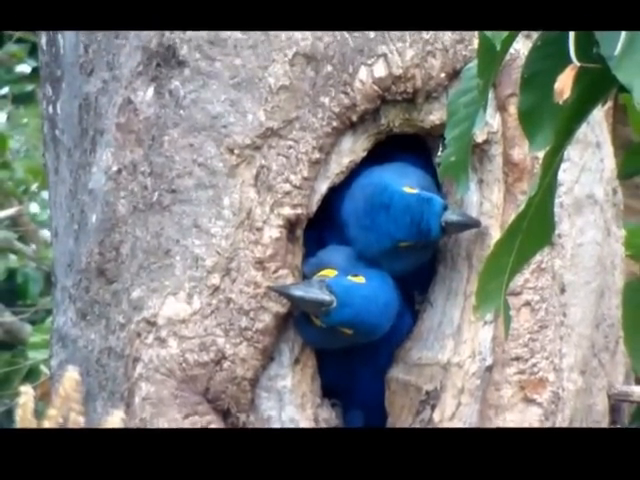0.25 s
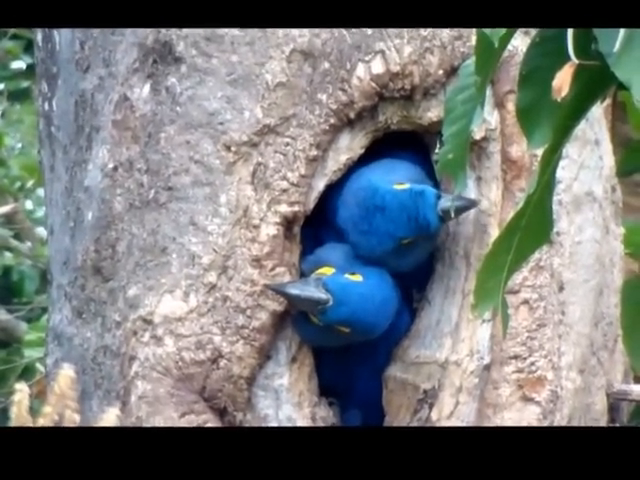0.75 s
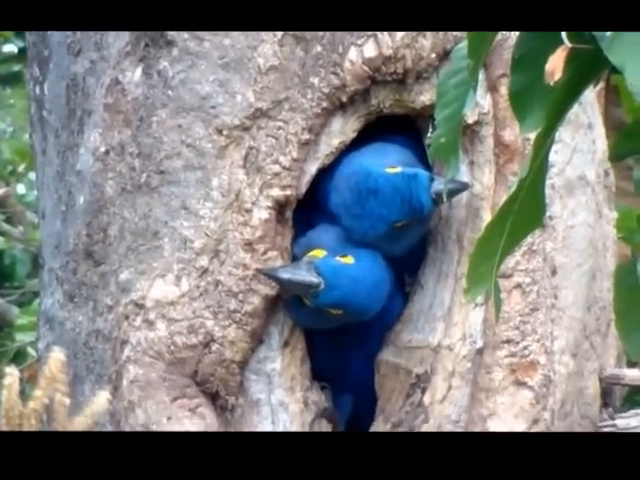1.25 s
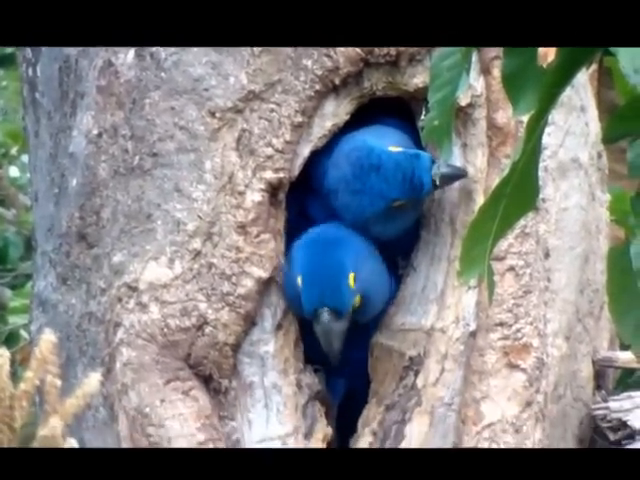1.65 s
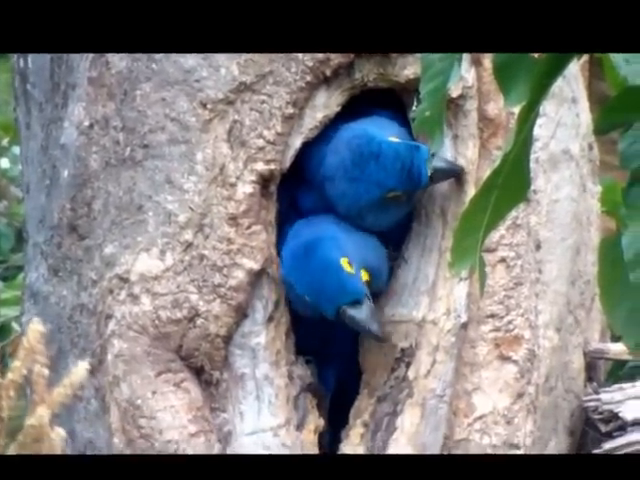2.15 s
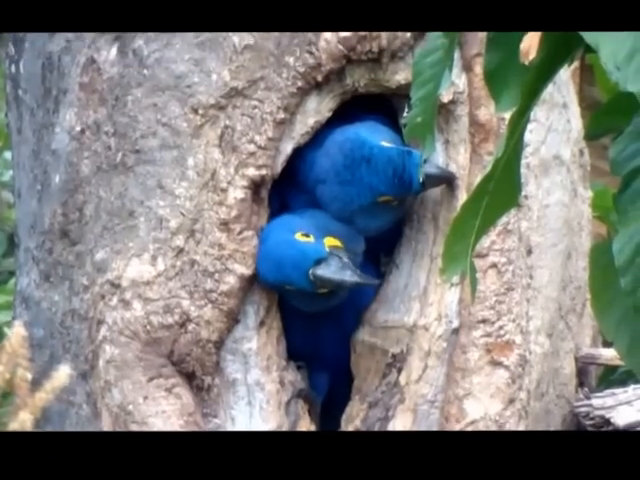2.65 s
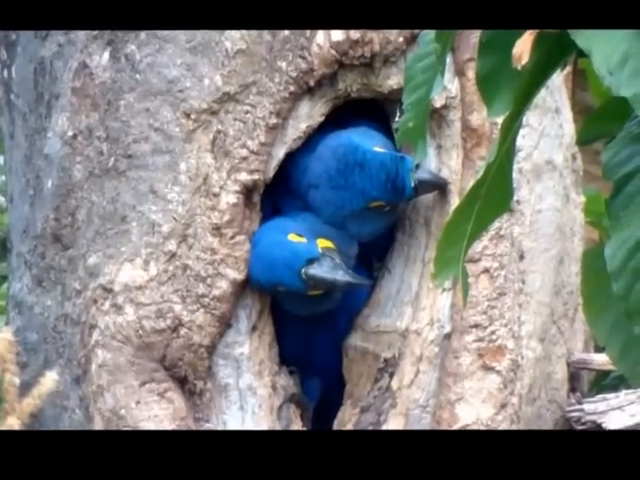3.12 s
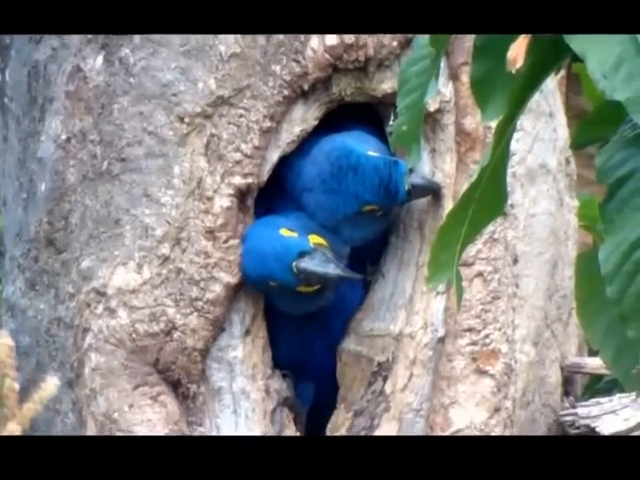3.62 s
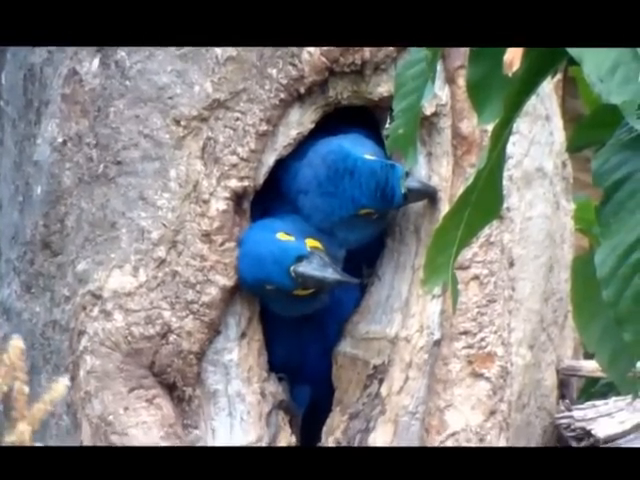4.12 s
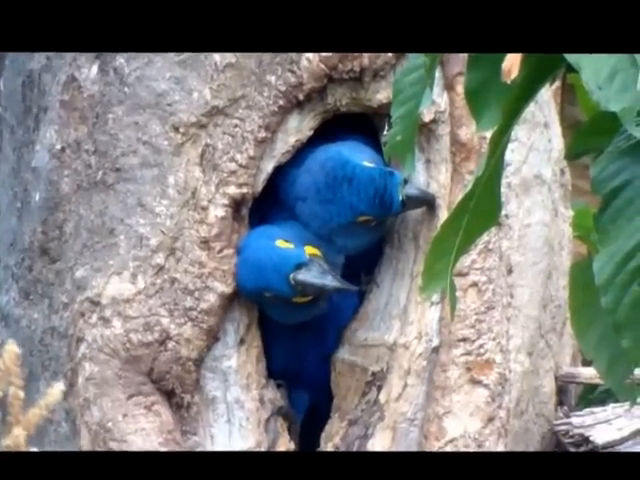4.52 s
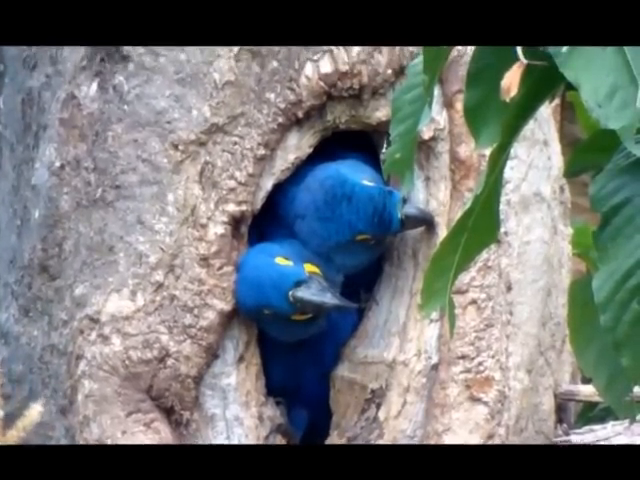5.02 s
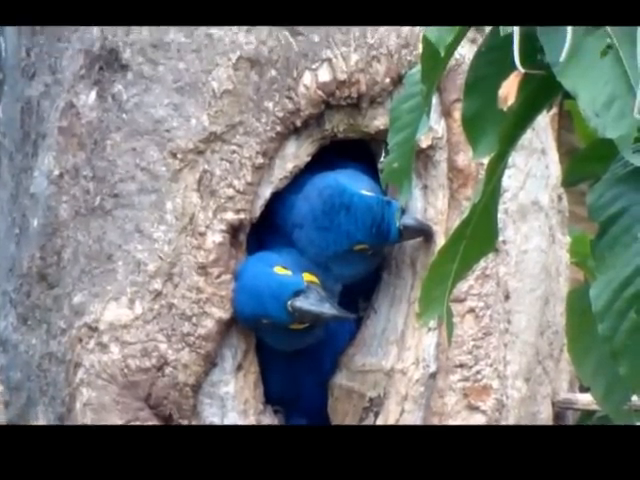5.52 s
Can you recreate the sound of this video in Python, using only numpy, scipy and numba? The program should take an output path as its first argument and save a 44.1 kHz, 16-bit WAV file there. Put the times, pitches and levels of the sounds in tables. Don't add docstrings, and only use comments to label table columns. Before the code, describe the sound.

Large parrots at a tree hole: one harsh loud squawk, a weaker reply, later faint calls, with insects, small birds and wind puffs.

```python
import sys
import numpy as np
from scipy import signal
from scipy.fft import rfft, irfft
from scipy.io import wavfile
from scipy.ndimage import uniform_filter1d
from numba import njit

SR = 44100
rng = np.random.default_rng(int(sys.argv[2]) if len(sys.argv) > 2 else 0)


def transcribe(signal):
    frames = np.atleast_2d(signal).T
    limited = np.clip(frames, -1, 1)
    pcm = np.round(limited * 32767).astype(np.int16)
    wavfile.write(sys.argv[1], SR, pcm)


def gain_from_db(level_db):
    decades = np.asarray(level_db, float) / 20
    return 10 ** decades


N = 254010
TIME = np.arange(N) / SR


def unit(x):
    return x / np.sqrt(np.mean(x ** 2))


def evenly(values, at):
    return np.interp(at, np.linspace(at[0], at[-1], len(values)), values)


@njit
def flaps(hz, rough, chance, jitter, shimmer):
    pulses, phase = np.zeros(len(hz) + 1), np.empty(len(hz))
    p, k = 0., 0
    for i in range(len(hz)):
        step = hz[i] * np.exp(jitter * rough[i] * chance[k, 0]) / SR
        p += step
        if p >= 1:
            p, k = p - 1, k + 1
            size = np.exp(shimmer * rough[i] * chance[k, 1])
            pulses[i] += size * p / step
            pulses[i + 1] += size * (1 - p / step)
        phase[i] = p
    return pulses[:-1], phase


@njit
def resonance(x, hz, width):
    y, band, low = np.empty(len(x)), 0., 0.
    for i in range(len(x)):
        g, k = np.tan(np.pi * hz[i] / SR), width / hz[i]
        v = (band + g * (x[i] - low)) / (1 + g * (g + k))
        band, low, y[i] = 2 * v - band, low + 2 * g * v, k * v
    return y


def macaw(throbs, throat, rough, dip_s, breath_db, hum_db, sag=None):
    s, start_hz, db, dip_db = np.transpose(throbs)
    rough = evenly(rough, s)
    end_hz = np.append(start_hz[1:], start_hz[-1])
    if sag:
        end_hz = start_hz * (1 - evenly(sag, s))
    first, last = int(s[0] * SR), int(s[-1] * SR) + SR // 50
    t = TIME[first:last]
    k = np.clip(np.searchsorted(s, t, side="right") - 1, 0, len(s) - 1)
    along = np.clip((t - s[k]) / np.append(np.diff(s), 1)[k], 0, 1)
    hz = uniform_filter1d(start_hz[k] + (end_hz - start_hz)[k] * along, size=150)

    chance = np.clip(rng.standard_normal((1000, 2)), -2, 1.5)
    pulses, phase = flaps(hz, rough[k], chance, .22, .8)
    air = unit(rng.standard_normal(len(t)) * np.exp(-phase / .5))
    source = unit(pulses - pulses.mean()) + gain_from_db(breath_db) * rough[k] * air
    raspy = source + gain_from_db(5) * air

    u, voice = np.linspace(0, 1, len(t)), 0
    for j, (a_hz, mid_hz, b_hz, width, *moving_db) in enumerate(throat):
        upper = j > 5
        shift = uniform_filter1d(rng.standard_normal((len(s), 2))[k], size=300, axis=0)
        drift = .05 * (along - .5) / (1 + (j > 4))
        centre = evenly([a_hz, mid_hz, b_hz], u) * (1 + .013 * shift[:, 0] - drift)
        gain = gain_from_db(evenly(moving_db, u) + shift[:, 1] * (j > 3)) / np.sqrt(width)
        if sag and j == 3:
            gain *= gain_from_db(6 * uniform_filter1d(.5 - along, size=150))
        if upper:
            gain *= np.clip(.1 + (t - s[0]) / .05, 0, 1)
        once = resonance(raspy if upper else source, centre, float(width))
        voice = voice + (-1) ** j * gain * resonance(once, centre, float(width))
    voice /= np.sqrt(uniform_filter1d(voice ** 2, size=SR // 60))
    voice += gain_from_db(hum_db) * np.sqrt(2) * np.sin(2 * np.pi * np.cumsum(hz) / SR)

    lag = t - s[:, None]
    dip_width = np.where(lag < 0, 1.4 * dip_s, .7 * dip_s)
    dips = np.sum(dip_db[:, None] * np.exp(-(lag / dip_width) ** 2), axis=0)
    level_db = db[k]
    if sag:
        level_db = level_db - 18 * (1 - end_hz / start_hz)[k] * along
    ending = np.clip((s[-1] - t) / 0.008 + 1, 0, 1)
    out = np.zeros(N)
    out[first:last] = voice * gain_from_db(uniform_filter1d(level_db, size=200) + dips) * ending
    return out


def squawk():
    # (time [s], pitch [Hz], level [dB], dip at start [dB])
    throbs = [(.318, 265, -36, -14), (.33, 265, -29, -1), (.347, 270.5, -43, -4), (.361, 264.5, -20, -3),
              (.378, 265.2, -13, -1), (.405, 314.2, -11, -5), (.443, 322.2, -10.5, -5),
              (.476, 317, -10.5, -4), (.511, 304, -11.5, -4), (.547, 304.2, -11.5, -2),
              (.585, 307.1, -12.5, -10), (.62, 297.2, -12, -4), (.655, 284.4, -12.5, -5),
              (.689, 276.8, -13.5, -6), (.728, 305, -11.5, -11), (.766, 298.6, -9, -11),
              (.781, 269.6, -19, -3)]
    # (start [Hz], midway [Hz], end [Hz], width [Hz], levels from start to end [dB])
    throat = [(274, 322, 317, 200, -28, -23, -20), (492, 511, 669, 340, -17, -23.5, -14),
              (1244, 1240, 1180, 300, 4.3, 0.86, 2), (1460, 1456, 1417, 240, 8.6, 4.3, 2.4),
              (1993, 1849, 1747, 392, -14, 2, -6, -2, -1),
              (2100, 2388, 2698, 386, -11, -18, -13, -5.5, -5.5, -5, -1),
              (3897, 3587, 3839, 894, -58, -8.5, -16, -9.5, -9.5),
              (5104, 5245, 5402, 508, -37, -26, -27, -25, -18),
              (6393, 6437, 6296, 602, -10, -23.5, -17.5, -25, -22), (7436, 8998, 9800, 12000, -36, -31),
              (4400, 4350, 4450, 398, -42, -28, -24, -37, -22),
              (7500, 7596, 7397, 697, -64, -35, -47, -57, -40),
              (2800, 2600, 2600, 1300, -4, -9.5, -13.5, -36, -37, -40, -38)]
    return macaw(throbs, throat, (.2, .13, .18, .22, .18), .0065, 4, -40, (.04, .14, .15, .14))


def answer():
    # (time [s], pitch [Hz], level [dB], dip at start [dB])
    throbs = [
        (.78, 249.2, -22.5, 12),
        (.83, 240.7, -24.5, -4.5),
        (.886, 227.5, -26, -0.5),
        (.894, 444.5, -25, -1),
        (.915, 484.4, -28.5, -3),
        (.948, 465.6, -25, 1.5),
        (.975, 400, -26.5, -1.5),
        (1.025, 378.5, -31, -0.5),
        (1.047, 360, -34, -5),
    ]
    # (start [Hz], midway [Hz], end [Hz], width [Hz], levels from start to end [dB])
    throat = [(238, 296, 210, 82, -26.5, 16), (497, 569, 638, 370, -25, 21.5),
              (730, 726, 620, 500, -15, -2, 11), (1540, 1540, 2372, 400, 0.5, 8),
              (1650, 1670, 1630, 380, 1.5, 28.3), (1985, 2000, 1896.5, 280, -14, -4),
              (3840, 2800, 2203, 2400, -10, -37)]
    rough = (.33, .3, .2, .07, .04, .08, .2, .3, .38)
    return macaw(throbs, throat, rough, .005, 6, -34)


def grumble():
    # (time [s], pitch [Hz], level [dB], dip at start [dB])
    throbs = [
        (3.34, 148.6, -42.5, -7),
        (3.4, 160.6, -44, -1),
        (3.445, 159.1, -39.5, 2),
        (3.5, 159, -44, 2),
        (3.555, 152.5, -40, -7),
        (3.625, 148, -46, -16),
    ]
    # (start [Hz], midway [Hz], end [Hz], width [Hz], levels from start to end [dB])
    throat = [(318, 280, 580, 220, -13.5, -2), (1490, 1640, 1400, 260, 6, 2),
              (2400, 2400, 2400, 600, -36, -33)]
    return macaw(throbs, throat, (.6, .65), 0.031, 17.0, -33)


def far_squawk():
    # (time [s], pitch [Hz], level [dB], dip at start [dB])
    throbs = [(4.46, 576.3, -46, -21), (4.505, 556.6, -38, -6), (4.553, 567.4, -37, -2),
              (4.597, 571.3, -38, -4.5), (4.64, 591.5, -36.5, -1.5), (4.69, 577.7, -38.5, -2),
              (4.732, 543.6, -39.5, -4), (4.775, 553.3, -39.5, -1), (4.81, 570, -36.5, -1),
              (4.84, 584, -35, -5.5), (4.895, 593, -36.5, -4), (4.912, 578, -49, 0)]
    # (start [Hz], midway [Hz], end [Hz], width [Hz], levels from start to end [dB])
    throat = [(680, 580, 870, 320, 2.5, 2.2, 3), (1150, 1040, 1187, 217, 3.5, -2),
              (1500, 1390, 1560, 460, 2.4, 9.4), (2000, 2032, 2600, 810, 4.5, -7),
              (3450, 3450, 3652, 402, -15, -3, -15, -9, -6)]
    # (time [s], pitch [Hz], level [dB], dip at start [dB])
    second_throbs = [
        (4.503, 665, -37.5, -18),
        (4.553, 652, -38, -2),
        (4.563, 505, -38, 0),
        (4.58, 505, -43, -3),
        (4.6, 515.5, -37, -4),
        (4.63, 499, -46, -8),
    ]
    # (start [Hz], midway [Hz], end [Hz], width [Hz], levels from start to end [dB])
    second_throat = [(1333, 1480, 1560, 220, 7, 6), (1980, 2050, 2000, 400, 2, -4),
                     (2520, 2550, 2400, 400, -12, -12)]
    first = macaw(throbs, throat, (.42, .36, .38), .007, 6, -8, (-.13, -.11, .04, -.02, 0))
    return first + macaw(second_throbs, second_throat, (.04, .24, .3), .005, 0, -40)


def caw():
    # (time [s], pitch [Hz], level [dB], dip at start [dB])
    throbs = [
        (3.75, 290, -59, -6),
        (3.85, 288.7, -55, 1),
        (3.9, 300, -54, -1),
        (3.97, 290, -56, -1),
        (4.06, 289, -59, -5),
        (4.15, 297, -62, -8),
    ]
    # (start [Hz], midway [Hz], end [Hz], width [Hz], levels from start to end [dB])
    throat = [(880, 1020, 920, 220, -6, 5, -17), (1170, 1120, 1300, 420, 0, -2, 4),
              (1450, 1330, 1300, 250, -10, -2, -12)]
    return macaw(throbs, throat, (.12, .2, .1), .01, 5.1, -40)


def hollow(x, share, length_s):
    t = np.arange(int(0.025 * SR)) / SR
    smear = rng.standard_normal(len(t)) * np.exp(-t / length_s)
    smear /= np.sqrt(np.sum(smear ** 2))
    return x + share * signal.fftconvolve(x, smear)[:N]


def pan(x, db):
    return x * gain_from_db(np.array([db / 2, -db / 2]).reshape(2, -1))


def trees(x, wet_db, t60_s=1.1):
    t = np.arange(SR) / SR
    tail = rng.standard_normal((2, SR)) * gain_from_db(-60 * t / t60_s) * np.minimum(t / 0.0024, 1)
    middle = signal.butter(1, [900, 6000], "bandpass", fs=SR, output="sos")
    tail = signal.sosfilt(middle, tail + 0.64 * tail[::-1])
    tail /= np.sqrt(np.sum(tail ** 2, axis=1, keepdims=True))
    return x + gain_from_db(wet_db) * signal.fftconvolve(x, tail, axes=1)[:, :N]


def walk(rate):
    k = int(SR / rate)
    held = np.repeat(rng.standard_normal(N // k + 1), k)
    return 1.41 * uniform_filter1d(uniform_filter1d(held, k), k)[:N]


def songbirds():
    # (time [s], length [s], start [Hz], end [Hz], level [dB])
    chirps = [
        (1.587, .078, 2300, 1700, -54),
        (1.81, .08, 1830, 1880, -57.5),
        (1.945, .04, 1252, 825, -56),
    ]
    # (time [s], length [s], start [Hz], end [Hz], level [dB])
    downsweeps = [
        (2.135, .08, 2150, 1450, -55.5),
        (2.775, .08, 2190, 1500, -54.5),
    ]
    # (time [s], length [s], start [Hz], end [Hz], level [dB])
    peeps = [(.965, 0.039, 2150, 1670, -43.5), (1.07, 0.039, 1810, 1860, -76),
             (1.219, 0.31, 1200, 1158, -61), (2.11, 0.032, 1793, 2130, -56), (2.6, 0.046, 2490, 2230, -56),
             (2.635, 0.017, 3080, 3300, -55), (2.65, 0.023, 4300, 4150, -56), (2.815, .02, 3050, 3240, -54),
             (2.655, 0.013, 2940, 2780, -53), (3.02, 0.038, 2760, 2980, -57.5),
             (3.305, 0.04, 4600, 4870, -51), (3.4, 0.074, 4950, 4850, -56), (5.505, .037, 2400, 2140, -58),
             (5.566, 0.042, 4090, 4100, -60), (5.629, 0.03, 4080, 4060, -58),
             (5.618, 0.036, 2900, 2710, -58), (5.658, 0.024, 2940, 2340, -50.5),
             (5.72, .048, 3490, 3240, -55)]
    # (time [s], length [s], start [Hz], end [Hz], level [dB])
    warble = [(3.55, 0.052, 3150, 2830, -52.5), (3.6, 0.07, 3050, 2870, -59),
              (3.675, 0.042, 3030, 3560, -52), (3.711, 0.04, 3300, 2720, -49),
              (3.738, 0.083, 2750, 2696, -55), (3.85, 0.035, 3050, 2820, -58),
              (3.878, 0.026, 2900, 2990, -47.5), (3.9, 0.031, 2920, 2310, -49),
              (3.926, 0.047, 2370, 3130, -48), (3.956, 0.079, 3220, 2270, -47),
              (4.035, 0.0386, 2245, 2766, -51.5), (4.069, 0.079, 2730, 2714, -49.5),
              (4.154, 0.05, 2700, 2640, -63)]
    out = np.zeros(N)
    flutter = gain_from_db(1.5 * walk(70))
    for notes, octave_db in [(chirps, -3), (downsweeps + peeps + warble, -28)]:
        for s, length, start_hz, end_hz, db in notes:
            i = np.arange(int(s * SR), min(int((s + length) * SR), N))
            u = np.linspace(0, 1, len(i))
            glide = u * u * (3 - 2 * u)
            turn = 2 * np.pi * np.cumsum(start_hz + (end_hz - start_hz) * glide) / SR
            edge = np.clip(np.minimum(u, 1 - u) * length / 0.007, 0, 1)
            tone = np.sin(turn) + gain_from_db(octave_db) * np.sin(2 * turn)
            out[i] += np.sqrt(2) * gain_from_db(db) * edge * tone
    return out * flutter


def mew():
    # (time [s], pitch [Hz], 2nd partial [dB], 3rd partial [dB])
    arch = [
        (3.13, 1410, -66, -56),
        (3.16, 1520, -59, -52),
        (3.2, 1600, -57, -53),
        (3.25, 1640, -57, -52),
        (3.3, 1660, -57, -52),
        (3.38, 1625, -58, -50),
        (3.46, 1560, -60, -55),
        (3.53, 1470, -64, -57),
        (3.63, 1350, -72, -61),
    ]
    s, *columns = np.transpose(arch)
    hz, second_db, third_db = [np.interp(TIME, s, column) for column in columns]
    turn = 2 * np.pi * np.cumsum(uniform_filter1d(hz, size=900) * (1 + 0.001 * walk(60))) / SR
    on = np.clip(np.minimum(TIME - s[0], s[-1] - TIME) / 0.0073, 0, 1)
    partials = gain_from_db(second_db + 1.5) * np.sin(2 * turn) + gain_from_db(third_db + 1) * np.sin(3 * turn)
    return np.sqrt(2) * on * partials


def wing_strokes(cycles, duty):
    return np.cos(np.pi / 2 * np.clip(((cycles + .5) % 1 - .5) * 2 / duty, -1, 1))


def cricket():
    # (last pulse [s], length [s])
    bouts = [
        (.304, .39),
        (1.435, .6),
        (2.538, .65),
        (3.579, .64),
        (4.681, .61),
        (5.666, .52),
    ]
    song_hz, strokes_per_s, pitch_sag, duty = 6216, 34.4, .055, .45
    out = 0
    for s, length in bouts:
        warm = np.clip((TIME - s + length) / .14, 0, 1)
        turn = 2 * np.pi * np.cumsum(song_hz * (1 - pitch_sag * (1 - warm) ** 2)) / SR
        on = np.sqrt(warm) * (TIME < s + .5 / strokes_per_s)
        pulses = wing_strokes((TIME - s) * strokes_per_s, duty * 2) ** 2
        out = out + 1.38 * on * pulses * np.sin(turn)
    return pan(out, -2) * gain_from_db(-49.5 + 1.2 * walk(27))


def hump(s, hold, rise, fall):
    before, after = np.minimum(TIME - s, 0), np.maximum(TIME - s - hold, 0)
    return np.exp(-(before / rise) ** 2 - (after / fall) ** 2)


def chorus():
    # (pitch [Hz], stroke rate [1/s], level [dB])
    songs = [
        (4600, 64, 8),
        (4704, 9, 9.5),
        (4750, 72, -17),
        (4980, 43, -8),
        (5390, 33, 1),
        (5730, 12, -12),
    ]
    # (time [s], hold [s], level [dB])
    swells = [
        (0.817, .3, -57),
        (2.24, 0.24, -53.5),
        (3.404, 0.41, -55.5),
        (4.876, 0.37, -60.5),
        (5.701, 0.18, -62),
    ]
    low, high = 0, 0
    for j, (hz, rate, db) in enumerate(songs):
        strokes = 0.67 + wing_strokes(np.cumsum(rate * (1 + 0.033 * walk(5.7))) / SR, 1.0)
        rasp = resonance(rng.standard_normal(N) * strokes, hz * (1 + 0.02 * walk(1.896)), 87.0)
        rasp = pan(unit(rasp) * gain_from_db(db + 1.0 * walk(2.18)), 3 * (-1) ** j)
        if j < 3:
            low = low + rasp
        else:
            high = high + rasp
    swell = gain_from_db(-58) + sum(gain_from_db(db) * hump(s, hold, .05, .06) for s, hold, db in swells)
    return unit(low) * swell + unit(high) * gain_from_db(-57)


def shaped(table):
    hz, value = np.transpose(table)
    return np.interp(np.log(np.fft.rfftfreq(N, 1 / SR) + 1), np.log(hz), value)


def forest():
    # (frequency [Hz], level [dB])
    colour = [(59, -19.5), (258, -8), (758, -14), (4190, -18), (4660, -12), (6120, -13), (6660, -21),
              (15500, -30.5)]
    # (frequency [Hz], likeness [0-1])
    likeness = [(100, 0.73), (500, 0.53), (2000, 0.51), (5000, 0), (12000, 0.07)]
    # (time [s], hold [s], level over rest [dB])
    stirs = [
        (0.353, 1.11, 4.5),
        (3.293, 0.56, 0.5),
    ]
    # (time [s], peak [dB], length [s])
    rustles = [
        (1.044, -39, 0.025),
        (1.234, -36.5, 0.016),
        (1.383, -41, 0.013),
        (1.421, -35.5, 0.029),
        (1.59, -40.5, 0.05),
        (1.676, -40, 0.02),
        (2.123, -41, 0.028),
    ]
    stir_db = sum(db * hump(s, hold, 0.07, 0.21) for s, hold, db in stirs)
    low_db, high_db = -56 + stir_db, -61.5 + 0.4 * stir_db

    like = np.clip(shaped(likeness), 0, 1)
    noise = rfft(rng.standard_normal((2, N)))
    mid, side = noise * gain_from_db(shaped(colour)) * np.sqrt([1 + like, 1 - like])
    both = np.array([mid + side, mid - side])
    hz = np.fft.rfftfreq(N, 1 / SR)
    high = 1 / (1 + (3000 / (hz + 1)) ** 4)
    low_rms = np.sqrt(np.mean(irfft(mid * (hz > 300) * (hz < 1000), N) ** 2))
    high_rms = np.sqrt(np.mean(irfft(mid * (hz > 8000) * (hz < 14000), N) ** 2))
    out = irfft(both * (1 - high), N) / low_rms * gain_from_db(low_db + 1.0 * walk(7.0))
    out += irfft(both * high, N) / high_rms * gain_from_db(high_db + .7 * walk(8))

    shake = 0
    for s, db, length in rustles:
        shake = shake + gain_from_db(db - 9.5) * np.exp(-((TIME - s - length / 2) / length) ** 2)
    crackle = rng.standard_normal((2, N)) * gain_from_db(2.7 * walk(270))
    crisp = signal.butter(1, [1500, 12000], "bandpass", fs=SR, output="sos")
    return out + shake * signal.sosfilt(crisp, crackle + 0.93 * crackle[::-1])


def wind():
    # (frequency [Hz], level [dB])
    colour = [(12, -40), (20, 6.5), (92, 3), (187, -9), (330, -21), (551, -30), (780, -78), (1320, -120)]
    # (time [s], hold [s], level [dB], left minus right [dB])
    gusts = [
        (2.216, 0.13, -46, -9),
        (2.537, 0.056, -46, -3),
        (3.815, 0.032, -44.5, 9),
        (3.956, 0.013, -35.5, -4),
        (4.09, 0.44, -33.5, 7),
        (4.59, 0.34, -38.5, 3),
        (5.054, 0.48, -49, 6.5),
        (5.622, 0.16, -38, -3),
    ]
    # (time [s], peak [dB], frequency
    # [Hz], left minus right [dB], push 1 or suck -1)
    puffs = [
        (1.17, -34.5, 187, -1, -1),
        (1.429, -43, 34.43, -21, -1),
        (1.549, -31.5, 250, 1, -1),
        (1.553, -32, 910, 0, -1),
        (2.26, -31, 50, 3, -1),
        (2.898, -35.5, 69.5, 12, -1),
        (3.979, -33.5, 280, 15, 1),
        (5.082, -32.5, 54.6, 13, -1),
             (2.549, -31.5, 103, -23.5, 1), (2.566, -36, 67, 25, 1), (3.12, -33, 53, 15, -1),
                  (3.933, -39, 35, -26, -1), (3.965, -23, 80, 9, 1), (3.968, -37.9, 35, -24, -1),
                  (3.979, -28.5, 125, 18, 1), (3.993, -33.5, 55, 21, 1), (4.056, -36, 55, 15, -1),
                  (4.104, -35, 45, -24, 1), (4.106, -35.2, 45.2, 24, -1), (4.129, -24, 65.4, 8, -1),
                  (4.144, -41, 45, 24, 1), (4.149, -34, 35, -20, -1), (4.191, -37, 35, 13, -1),
                  (4.219, -32.5, 80.2, 21, 1), (4.237, -43, 45, -27, -1), (4.256, -38, 65, 16, 1),
                  (4.271, -34, 55.5, 22, -1), (4.287, -37, 55, 24, -1), (4.31, -36, 55, 24, 1),
                  (4.359, -28, 55, -13, -1), (4.406, -36, 80, 20, -1), (4.435, -32.5, 54.7, 24, 1),
                  (4.47, -28.5, 80, 7, -1), (4.496, -46, 35, 20, 1), (4.507, -28.5, 80, 8, 1),
                  (4.538, -37, 80, 24, 1), (4.561, -38, 55, -24, -1), (4.566, -28.5, 55, 16, -1),
                  (4.599, -41, 65, 20, 1), (4.789, -30, 64.6, -22, 1), (5.121, -36, 45, 24, -1),
                  (5.212, -28, 55, 14, -1), (5.622, -26.5, 107, -18, 1), (5.634, -42, 55.3, -24, -1),
                  (5.646, -35.5, 80, 24, 1), (5.7, -39, 65, 20, -1)]
    eddies = rng.standard_normal((2, N)) * gain_from_db([3.5 * walk(40), 3.5 * walk(40)])
    rumble = unit(irfft(rfft(eddies - 0.0063 * eddies[::-1]) * gain_from_db(shaped(colour)), N))
    strength = gain_from_db(-49)
    for s, hold, db, pan_db in gusts:
        strength = strength + pan(gain_from_db(db) * hump(s, hold, 0.03, 0.067), pan_db)
    out = rumble * strength
    for s, peak_db, hz, pan_db, push in puffs:
        u = (TIME - s) * hz * np.pi
        puff = (1 - 2 * u ** 2) * np.exp(-np.minimum(u ** 2, 50))
        out += pan(np.sign(push) * gain_from_db(peak_db) * puff, pan_db)
    return out


def scene():
    near = hollow(squawk() + answer(), .2, .005)
    calls = trees(pan(near, -0.39), -21) + trees(pan(grumble(), 0), -21.0)
    distant = trees(pan(far_squawk() + caw(), -.2), -10)
    distant = distant + trees(pan(songbirds(), -1.4), -5.5, .55) + trees(pan(mew(), -1.4), -13, .55)
    return calls + distant + trees(cricket(), -31) + chorus() + forest() + wind()


def roll_off(x):
    return signal.sosfilt(signal.butter(12, 15760, fs=SR, output="sos"), x)


def record(dry):
    port_lag = 0.59
    late = np.exp(-2j * np.pi * np.fft.rfftfreq(N) * port_lag)
    ports = np.array([irfft(rfft(dry[0]) * late, N), dry[1]])
    heard = np.tanh(ports / .9) * .9
    return roll_off(heard)


dry = scene()
out = record(dry)
transcribe(out)
```